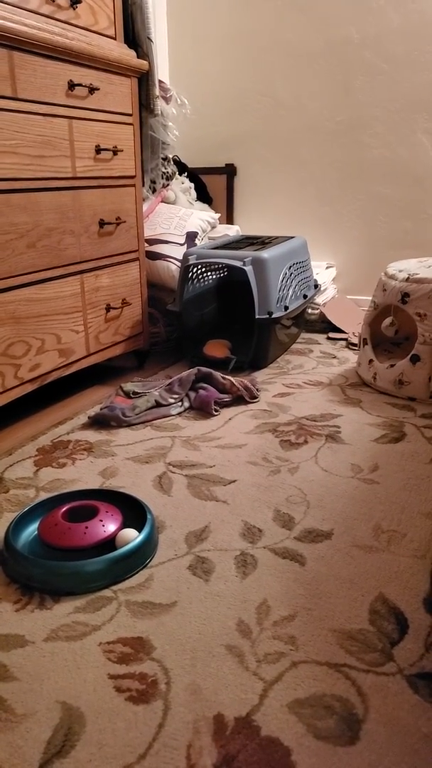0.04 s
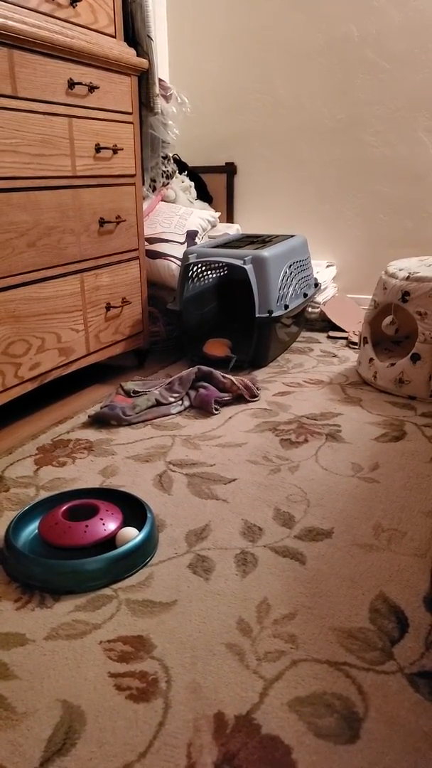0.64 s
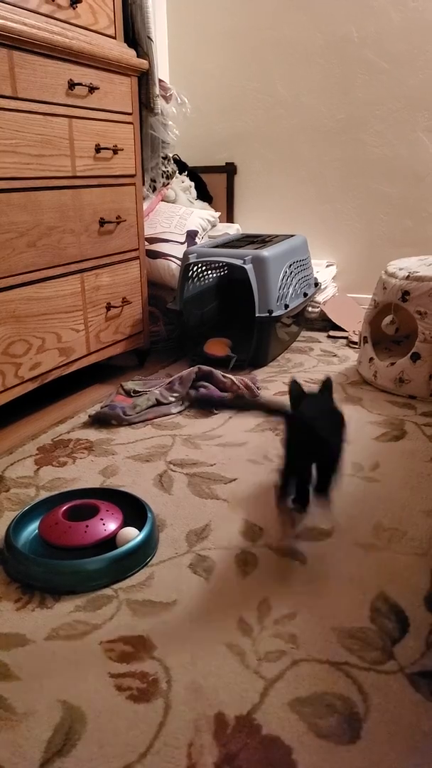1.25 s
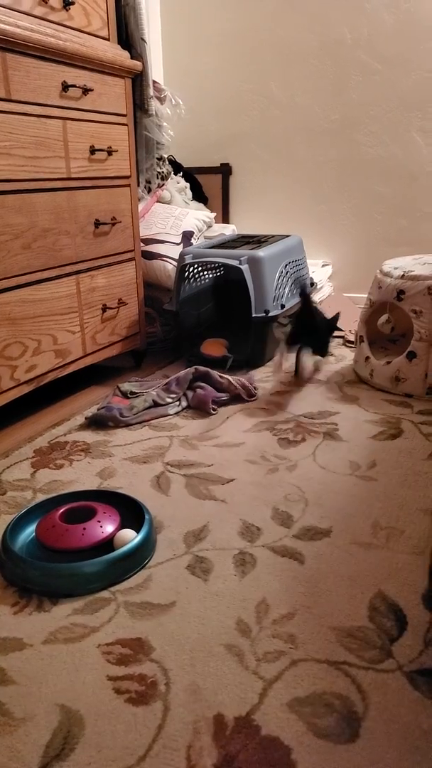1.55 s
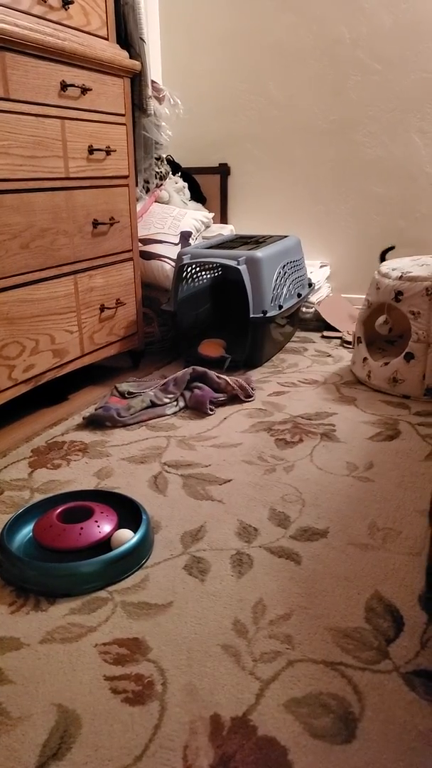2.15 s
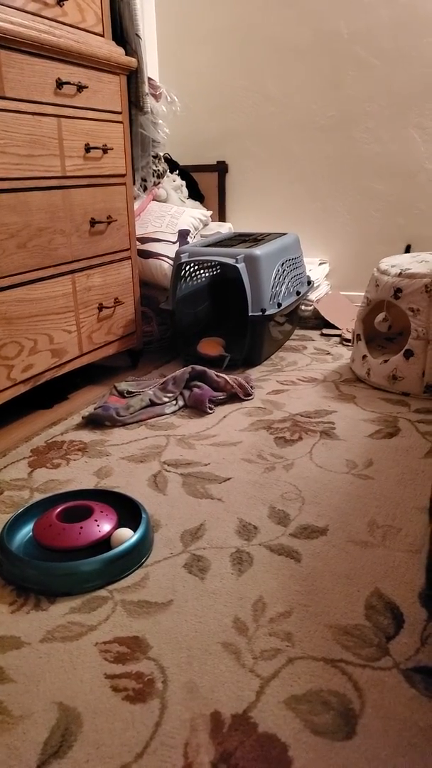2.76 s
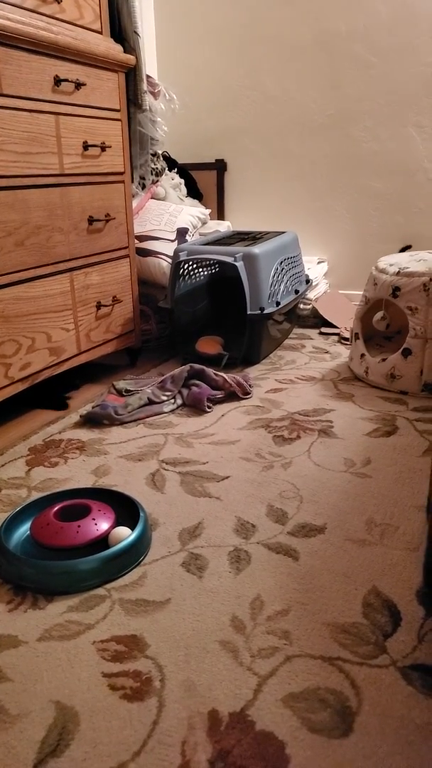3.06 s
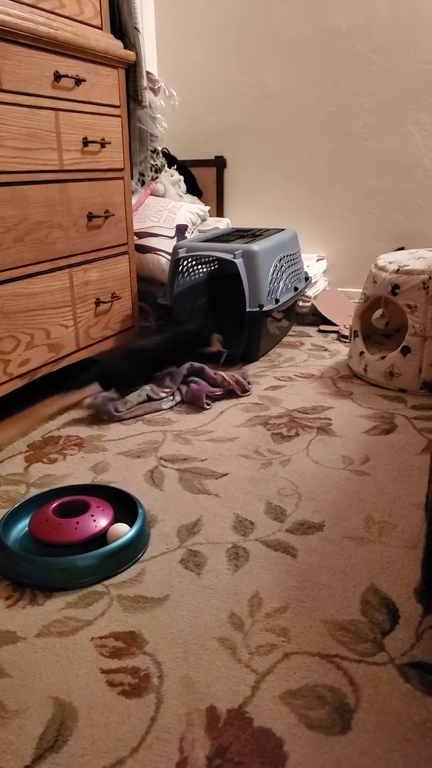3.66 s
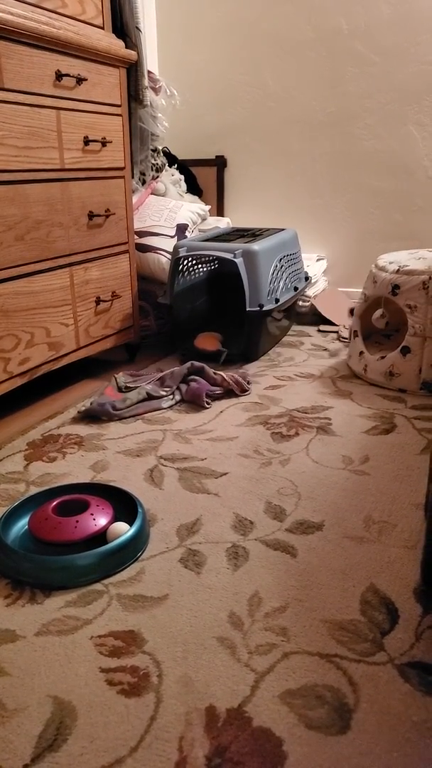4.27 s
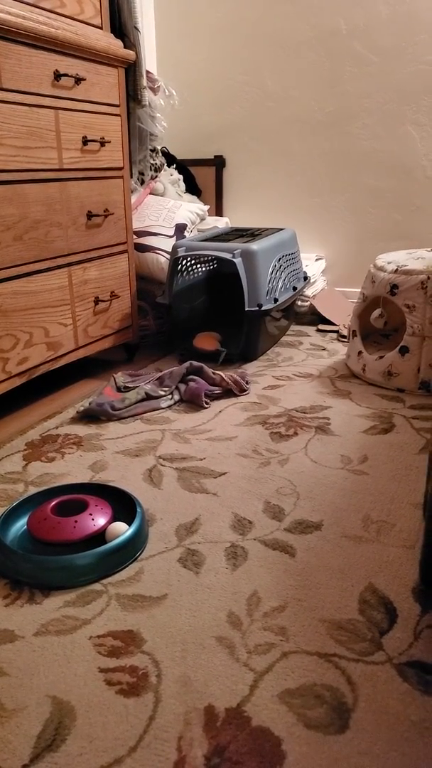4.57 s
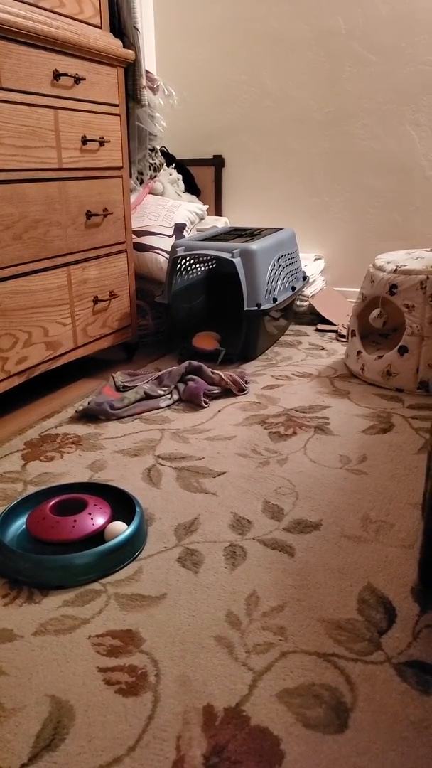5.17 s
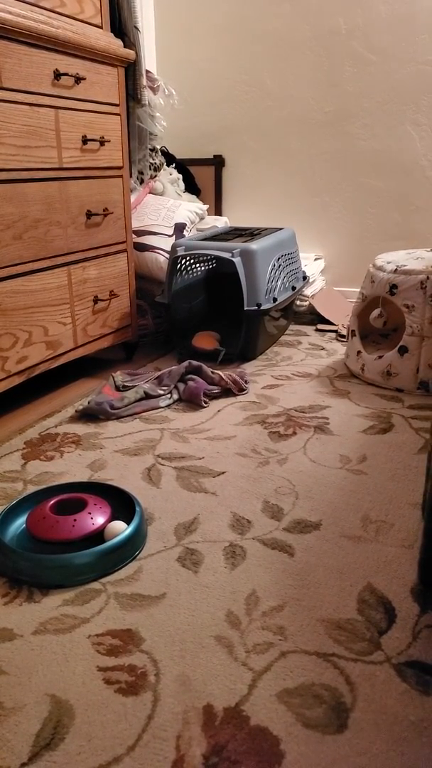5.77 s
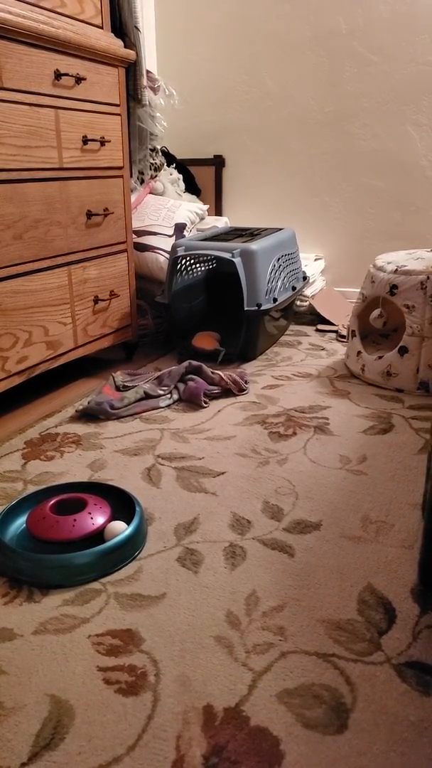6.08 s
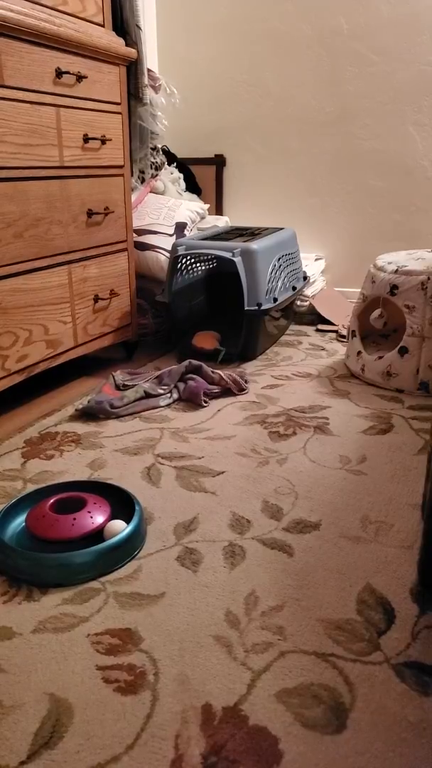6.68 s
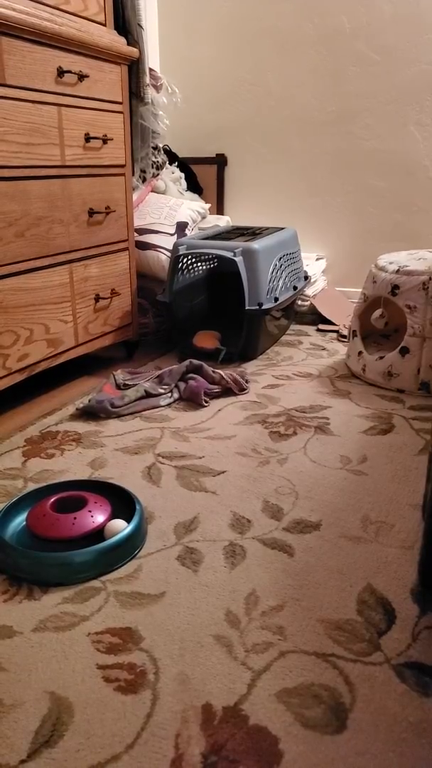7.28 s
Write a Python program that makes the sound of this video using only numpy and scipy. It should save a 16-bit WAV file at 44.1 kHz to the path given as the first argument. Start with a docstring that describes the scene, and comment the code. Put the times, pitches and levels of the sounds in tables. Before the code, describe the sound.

Kitten paws patter and thump across a carpeted bedroom floor, with claw scratches and a brief scramble bumping a hollow plastic carrier.

```python
"""First comes the faint hum of a quiet carpeted bedroom, then the patter of kittens' paws.
The kittens romp a few metres from a phone: soft pads strike the carpet and make the wooden floor
under it thump. Claws catch and slip on carpet, cloth and cardboard, bodies slide, and a short
scramble bumps a hollow plastic pet carrier. The small room rings briefly after each sound."""
import sys
import numpy as np
from scipy import signal
from scipy.fft import rfft, irfft
from scipy.io import wavfile
from scipy.ndimage import uniform_filter1d

SR = 44100
rng = np.random.default_rng(int(sys.argv[2]) if len(sys.argv) > 2 else 0)


def output_pcm(signal):
    """Save a mono or channel-first signal as 16-bit PCM at the path in sys.argv[1].

    Samples are clipped to [-1, 1] before scaling.
    """
    pcm = np.clip(np.atleast_2d(signal).T, -1, 1) * 32767
    wavfile.write(sys.argv[1], SR, np.round(pcm).astype(np.int16))


N = 328104

# Levels in the tables are relative: scene() sets how loud each layer is in the mix.
# tone of the room's rumble and hiss: (frequency [Hz], level [dB])
AIR_TONE = [(25, -30.5), (60, 1), (95, -11), (120, -7.5), (180, -15.5), (350, -22), (550, -38),
            (900, -35.5), (1800, -43), (3500, -44.5), (7500, -53), (9800, -47.5), (15500, -50)]
# how long the bedroom rings: (frequency [Hz], time to fade by 60 dB [s])
ROOM_DECAY = [(80, 0.52), (300, 0.3), (800, 0.28), (1800, 0.29), (4000, 0.23), (9000, 0.26)]
# rubs, low on carpet and high on stiff edges: (time [s], build-up [s], level [dB], pitch [Hz])
RUBS = [(1.171, 0.11, -66, 990), (1.32, 0.038, -53.5, 696), (1.54, 0.029, -59.5, 615),
        (1.895, 0.015, -31, 2470), (2.03, .015, -40, 2560), (2.36, 0.032, -64, 2060),
        (2.849, 0.0095, -36.5, 2000), (4.0, 0.14, -50, 640), (4.18, 0.069, -43, 644),
        (4.342, 0.0046, -25.5, 2450), (4.53, 0.019, -33.5, 2440), (4.62, 0.082, -40, 417),
        (4.93, 0.099, -58, 650), (5.189, 0.0036, -58.5, 3500), (5.819, 0.024, -68, 1300),
        (5.94, 0.044, -54, 860), (6.285, 0.018, -68.5, 2220), (6.3, 0.051, -74, 5920),
        (6.329, 0.058, -68, 3900)]
# claw strokes: (time [s], build-up [s], fabric hiss level [dB], cardboard rasp level [dB])
CLAW_STROKES = [(1.758, 0.02, -72, -67.5), (1.807, 0.047, -50.5, -45), (1.874, 0.024, -41.5, -30),
                (2.023, 0.027, -55, -45.5), (2.079, 0.036, -50.5, -53), (2.187, 0.0061, -52.5, -47),
                (2.33, .08, -60, -61), (2.459, 0.066, -60.5, -70.5), (2.848, 0.015, -48, -36),
                (2.865, 0.079, -56, -57.5), (3.529, 0.045, -69.5, -79), (3.912, 0.13, -56, -63),
                (4.004, 0.057, -39.5, -46), (4.029, 0.087, -46, -44.5), (4.197, 0.016, -55, -44),
                (4.245, 0.023, -40, -40), (4.28, .008, -29, -44), (4.29, 0.045, -33, -34.5),
                (4.421, 0.01, -30.5, -26), (4.47, 0.051, -48, -37), (4.519, 0.036, -44, -31.5),
                (4.57, 0.0073, -34.5, -32), (4.651, 0.034, -47, -40), (4.73, 0.036, -56.5, -52.5),
                (4.922, 0.026, -63.5, -67.5), (4.979, 0.051, -57.5, -59.5), (5.188, 0.0091, -68, -66),
                (5.324, 0.011, -68, -66), (5.941, 0.026, -64.5, -73), (5.99, .015, -77, -73.5),
                (6.22, 0.048, -77, -72), (6.473, 0.012, -48.5, -51.5), (6.54, 0.043, -64.5, -76),
                (6.64, 0.051, -66.5, -81), (6.795, 0.043, -54.5, -61.5), (6.917, .11, -69.5, -64.5),
                (7.171, 0.0028, -65.5, -80)]
# tone of scratched fabric: (frequency [Hz], level [dB])
FABRIC_TONE = [(1500, -31), (3000, -1.5), (4000, -0.5), (5200, -5), (6500, -4.5), (7600, -9), (9500, 0),
               (13000, -6), (15500, -5.5)]
# tone of scratched cardboard: (frequency [Hz], level [dB])
CARDBOARD_TONE = [(250, -11), (600, -9.5), (1050, -2.5), (1550, -1), (1900, -6.5), (2450, -4), (3100, -9),
                  (3750, -3), (4800, -14.5), (6000, -18.5), (7800, -27.5)]
# peaks and dips that the cardboard's panels add: (frequency [Hz], width [Hz], level [dB])
PANEL_RESONANCES = [(1550, 90, -1), (2180, 70, -1.5), (2434, 230, 1.5), (3650, 31, -3), (3520, 100, -2)]
# bumps on the plastic carrier: (time [s], level [dB], pitch [Hz])
CARRIER_BUMPS = [(1.839, -32.5, 736), (1.911, -36, 299.7), (4.192, -41, 483), (4.221, -40.5, 537.6),
                 (4.273, -35, 466), (4.313, -27, 664), (4.391, -28.5, 602.5), (4.412, -21.5, 339.3),
                 (4.422, -20, 543), (4.43, -20, 602), (4.471, -31, 536), (4.599, -22, 389),
                 (4.61, -25.5, 518), (6.001, -43.5, 620)]
# notes the carrier's shell rings at: (frequency [Hz], level [dB], time to fade by 60 dB [s])
SHELL_NOTES = [(283.7, -7.5, .2), (349, -7, .2), (463, -5.5, .12), (501, -3, .18), (534.6, 0, .17),
               (687, -4.5, .17), (767, 1, .15), (795, -4.5, .17), (877, -7, .2), (1093, -0.5, .2),
               (1290, -4, .15)]
# firm steps: (time [s], pad level [dB], floor thump level [dB], pad pitch [Hz])
FIRM_STEPS = [(0.535, -51.5, -53.5, 271), (.797, -53, -54.5, 315), (.887, -45, -48, 303),
              (.951, -39, -45, 349), (1.054, -63, -61, 604), (1.098, -41.5, -45, 390),
              (1.232, -54, -57, 376), (1.298, -48, -53, 314), (1.389, -49.5, -41.5, 534),
              (1.431, -43, -32, 434), (1.538, -37.5, -35.5, 453), (1.758, -59.5, -42, 388),
              (1.827, -43, -38, 354), (2.106, -49, -41.5, 624), (2.191, -42.5, -33.5, 374),
              (2.399, -49.5, -60.5, 505), (3.487, -73, -45, 149.7), (3.895, -60, -61.5, 349),
              (4.003, -50, -37, 319.7), (4.061, -47, -44, 348), (4.162, -40.5, -34.5, 384),
              (4.249, -33.5, -34, 393), (4.292, -47, -29.5, 252), (4.409, -32.5, -39, 202),
              (4.535, -54, -32.5, 200), (4.688, -41, -37, 394), (4.737, -44.5, -38, 265),
              (4.814, -65, -58, 308), (4.924, -41.5, -50.5, 253), (5.011, -44.5, -34.5, 330),
              (5.121, -55.5, -43, 453), (5.148, -55.5, -37, 200), (5.821, -53.5, -38.5, 250),
              (5.941, -43, -32, 270), (5.963, -43.5, -43, 161), (6.0, -37, -40, 162.6),
              (6.181, -45, -40.5, 260), (6.24, -46, -37, 237), (6.472, -60.5, -38, 199),
              (6.502, -55.5, -32, 203), (6.521, -42, -51.5, 293), (7.31, -62.5, -42, 200)]
# spells of light treading: (start [s], end [s])
TREADING_SPELLS = [(3.36, 3.45), (5.2, 5.5), (6.62, 7)]
# how the two microphones differ: (frequency [Hz], left minus right level [dB])
MIC_BALANCE = [(60, -1.24), (200, -2), (400, 1), (1300, -1.5), (2400, -3.5), (4400, 0), (8000, 3.5),
               (15000, -1)]

SIZE = 24576  # samples in one short sound
T = np.arange(SIZE) / SR  # its time axis [s]
F = np.maximum(np.arange(SIZE // 2 + 1) * SR / SIZE, 1)  # its frequency axis [Hz]
SCENE_F = np.maximum(np.arange(N // 2 + 1) * SR / N, 1)  # the whole scene's frequency axis [Hz]
MIC_GAP_S = 0.00056  # sound's travel time between the two microphones
AIR_DB, HUM_HZ, HUM_DB = -63.5, 114, -66.5
TREAD_GAP_S, TREAD_PAD_DB, TREAD_FLOOR_DB, TREAD_HZ = 0.13, -69, -48.5, 306
# paws land in pairs: the second comes a moment later and lighter
PAIR_GAP_S, PAIR_PAD_DB, PAIR_FLOOR_DB = 0.042, -23, -6.5
# the floor swings faster under a harder push: pitch at a reference level, and its rise
FLOOR_HZ, FLOOR_REF_DB, FLOOR_HZ_PER_DB = 95.13, -38, 1.5
FAR_FROM_S = 1.7  # from here on the kittens are behind the furniture


def gain(db):
    """Turn decibels into a number to multiply by."""
    return 10 ** (np.asarray(db) / 20)


def look_up(table, hz):
    """Read between the rows of a (frequency, value) table, giving each octave equal room."""
    frequencies, values = np.transpose(table)
    return np.interp(np.log(hz), np.log(frequencies), values)


def unit_energy(x):
    """Scale a sound so that its channels have an average energy of 1."""
    return x / np.sqrt(np.mean(np.sum(x ** 2, axis=-1)))


def coloured(x, tone):
    """Filter a sound by a gain curve so that each click rings after it happens, not before."""
    cepstrum = irfft(np.log(tone + 1e-5))
    cepstrum[1:SIZE // 2] *= 2  # move the filter's early half onto its late half
    cepstrum[SIZE // 2 + 1:] = 0
    return irfft(rfft(x) * np.exp(rfft(cepstrum)))


def surrounding_noise(hz):
    """Spectra of noise from all sides: the bass is alike at both microphones, the treble is not."""
    alike = 0.99 * np.sinc(2 * hz * MIC_GAP_S)
    mid, side = rng.standard_normal((2, len(hz))) + 1j * rng.standard_normal((2, len(hz)))
    side = side * np.sqrt(1 - alike)
    return mid * np.sqrt(1 + alike) + np.array([side, -side])


def still_room():
    """The background: the low rumble of the house, a thin hiss and a faint mains hum."""
    air = irfft(surrounding_noise(SCENE_F) * gain(look_up(AIR_TONE, SCENE_F)), N)
    hum = np.sqrt(2) * np.sin(2 * np.pi * HUM_HZ * np.arange(N) / SR)
    return gain(AIR_DB) * air / air.std() + gain(HUM_DB) * hum


def room_spots(direct_db, gap_s, max_lag_s):
    """Echo filters for eight spots in the room: the direct sound, a short gap, then the walls."""
    spots = []
    band_hz, decay_times = np.transpose(ROOM_DECAY)
    for _ in range(8):
        noise, echo = surrounding_noise(F), 0
        for share, decay_s in zip(np.eye(len(band_hz)), decay_times):
            band = np.interp(np.log(F), np.log(band_hz), share)
            echo = echo + irfft(noise * band) * np.exp(-np.log(1000) * T / decay_s)
        fade_in = 1 - np.exp(-(T / gap_s) ** 2)
        response = unit_energy(echo * fade_in)
        right_lag = int(max_lag_s * SR * rng.random())
        response[0, 0] += gain(direct_db)
        response[1, right_lag] += gain(direct_db)
        spots.append(rfft(response, 2 * SIZE))
    return spots


def place(out, start, sound, db, spots):
    """Add a sound from a random spot; db is the level of its loudest few milliseconds."""
    spot = spots[rng.integers(len(spots))]
    heard = irfft(rfft(sound, 2 * SIZE) * spot)[:, :SIZE]
    power = uniform_filter1d(np.mean(heard ** 2, axis=0), 256)
    i = max(int(start * SR), 0)
    out[:, i:i + SIZE] += (heard * gain(db) / np.sqrt(power.max()))[:, :N - i]


def stroke(swell_s, fade_s):
    """A movement gathers speed, then dies away."""
    rise = np.minimum(T / swell_s, 1) ** 1.6
    return rise * np.exp(-np.maximum(T - swell_s, 0) / fade_s)


def slide_speed(swell_s):
    """Speed of a claw or a sliding body: the longer it builds, the longer it takes to stop."""
    return stroke(swell_s, fade_s=0.0056 + 0.48 * swell_s)


def friction(snags_per_s, spread_db, jerk_db):
    """Fibres snag and let go: many clicks of unequal size, in jerks about 10 ms long."""
    snags = (rng.random(SIZE) < snags_per_s / SR) * rng.choice([-1, 1], SIZE)
    sizes = gain(spread_db * np.minimum(rng.exponential(size=SIZE), 4))
    jerk_starts = np.arange(0, SIZE, 400)
    jerks = np.interp(np.arange(SIZE), jerk_starts, rng.standard_normal(len(jerk_starts)))
    return snags * sizes * gain(jerk_db * jerks)


def rubs():
    """Bodies slide over carpet and claws skid along edges: uneven friction stirs one resonance."""
    out = np.zeros((2, N))
    spots = room_spots(direct_db=4.5, gap_s=0.0087, max_lag_s=0.0003)
    for start, swell_s, db, hz in RUBS:
        rub = slide_speed(swell_s) * friction(snags_per_s=1400, spread_db=5, jerk_db=2)
        breadth = 855 + 0.12 * hz  # higher resonances are broader
        resonance = 1 / (1 + ((F - hz ** 2 / F) / breadth) ** 2)
        place(out, start, coloured(rub, resonance ** 2), db, spots)
    return out


def scratches():
    """Claws hiss through fabric and rasp on cardboard, whose panels colour the rasp."""
    out = np.zeros((2, N))
    spots = room_spots(direct_db=-1, gap_s=0.0051, max_lag_s=0.0004)
    fabric = gain(look_up(FABRIC_TONE, F))
    panels_db = sum(db / (1 + (2 * (F - hz) / width) ** 2) for hz, width, db in PANEL_RESONANCES)
    cardboard = gain(look_up(CARDBOARD_TONE, F) + panels_db)
    for start, swell_s, hiss_db, rasp_db in CLAW_STROKES:
        speed = slide_speed(swell_s)
        hiss = speed * friction(snags_per_s=15000, spread_db=1.5, jerk_db=4.5)
        place(out, start, coloured(hiss, fabric), hiss_db, spots)
        rasp = speed * friction(snags_per_s=3500, spread_db=3.4, jerk_db=1.6)
        place(out, start, coloured(rasp, cardboard), rasp_db, spots)
    return out


def soft_tone(hz, narrowness):
    """Tone of a padded touch: a broad hump around hz that falls steeply above it."""
    ratio = (F / hz) ** 2
    return (ratio * np.exp(1 - ratio)) ** narrowness


def soft_blow(hz, narrowness, swing_db, sharpness, roll_s):
    """The heel lands, the toes roll down, and the struck spot swings a few times."""
    push = rng.standard_normal(SIZE) * unit_energy(stroke(roll_s / 2, roll_s / 2))  # the toes
    push[0] = 1  # the heel
    pad = 1 / np.sqrt(1 + (F / 900) ** 14)  # the pad soaks up the treble above 900 Hz
    muffled = coloured(push, soft_tone(hz, narrowness) * pad)
    swing = 1 + gain(swing_db) / (1 + 2j * sharpness * (F - hz) / hz)
    return unit_energy(irfft(rfft(muffled) * swing))


def carrier_bumps():
    """Each bump is a hollow blow plus the quieter ring of the carrier's plastic shell."""
    out = np.zeros((2, N))
    spots = room_spots(direct_db=2, gap_s=0.006, max_lag_s=0.0004)
    for start, db, hz in CARRIER_BUMPS:
        blow = soft_blow(hz, narrowness=0.2, swing_db=1, sharpness=4.5, roll_s=0.012)
        shell = np.zeros(SIZE)
        for note_hz, note_db, decay_s in SHELL_NOTES:
            strength = gain(note_db + 0.83 * rng.standard_normal())
            shell += strength * np.sin(2 * np.pi * note_hz * T) * np.exp(-np.log(1000) * T / decay_s)
        ring = unit_energy(signal.fftconvolve(blow, shell)[:SIZE])
        place(out, start, blow + gain(-5.5) * ring, db, spots)
    return out


def footsteps():
    """List the firm steps, plus light uneven treading in the same columns."""
    steps = list(FIRM_STEPS)
    for start, end in TREADING_SPELLS:
        for k, (late, harder) in enumerate(rng.standard_normal((8, 2))):
            if start + TREAD_GAP_S * k < end:
                time = start + TREAD_GAP_S * (k + 0.3 * late)
                pad_db, floor_db = TREAD_PAD_DB + 0.83 * harder, TREAD_FLOOR_DB + 0.89 * harder
                steps.append((time, pad_db, floor_db, TREAD_HZ))
    return steps


def floor_thumps(steps):
    """The floor swings briefly under each paw: one low note, with a weaker one above and below."""
    out = np.zeros((2, N))
    spots = room_spots(direct_db=11.5, gap_s=0.0029, max_lag_s=0.0001)
    push = stroke(swell_s=0.022, fade_s=0.018)
    for start, _, db, _ in steps:
        hz = FLOOR_HZ + FLOOR_HZ_PER_DB * (db - FLOOR_REF_DB)
        angle = 2 * np.pi * hz * T
        for delay, lighter_db in ((0, 0), (PAIR_GAP_S, PAIR_FLOOR_DB)):
            phases = rng.uniform(0, 2 * np.pi, 3)
            main = np.sin(angle + phases[0])
            above = gain(-12) * np.sin(1.65 * angle + phases[1])
            below = gain(-7.5) * np.sin(0.62 * angle + phases[2])
            place(out, start + delay, (main + above + below) * push, db + lighter_db, spots)
    return out


def paw_patter(steps):
    """Pairs of pads strike and brush the carpet; far steps arrive mostly by way of the walls."""
    out = np.zeros((2, N))
    near = room_spots(direct_db=2, gap_s=0.008, max_lag_s=0.0004)
    far = room_spots(direct_db=-2, gap_s=0.005, max_lag_s=0.0002)
    for start, db, _, hz in steps:
        spots = near if start < FAR_FROM_S else far
        for delay, lighter_db in ((0, 0), (PAIR_GAP_S, PAIR_PAD_DB)):
            pat = soft_blow(hz, narrowness=0.4, swing_db=3, sharpness=3.5, roll_s=0.008)
            place(out, start + delay, pat, db + lighter_db, spots)
        fibres = friction(snags_per_s=1500, spread_db=0.5, jerk_db=-3.5)
        brush = fibres * stroke(swell_s=0.008, fade_s=0.05)
        place(out, start, coloured(brush, soft_tone(hz=1590, narrowness=0.63)), db - 36.5, spots)
    return out


def scene():
    """Mix all the kittens' noises over the still room."""
    steps = footsteps()
    running = gain(2) * paw_patter(steps) + gain(3) * floor_thumps(steps)
    playing = gain(-0.6) * carrier_bumps() + gain(-0.88) * scratches() + gain(-0.54) * rubs()
    return running + playing + still_room()


def record(dry):
    """The two microphones differ a little in tone; the phone cuts the deepest bass and top treble."""
    balance_db = look_up(MIC_BALANCE, SCENE_F)
    mic_gains = gain(np.array([balance_db, -balance_db]) / 2)
    heard = irfft(rfft(dry) * mic_gains, N)
    bass_cut = signal.butter(4, 38, "high", fs=SR, output="sos")
    treble_cut = signal.ellip(10, 0.2, 80, 15850, fs=SR, output="sos")
    return signal.sosfilt(treble_cut, signal.sosfilt(bass_cut, heard))


dry = scene()
out = record(dry)
output_pcm(out)
```